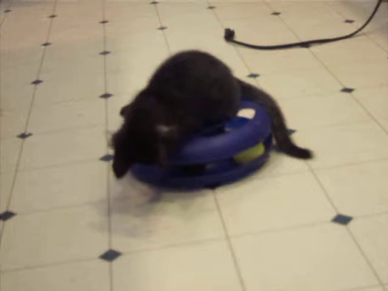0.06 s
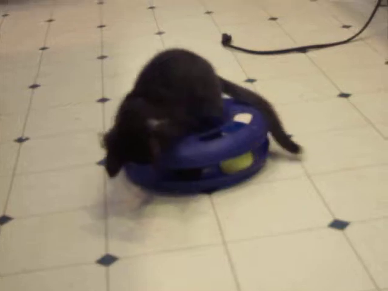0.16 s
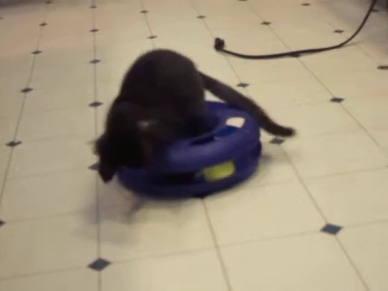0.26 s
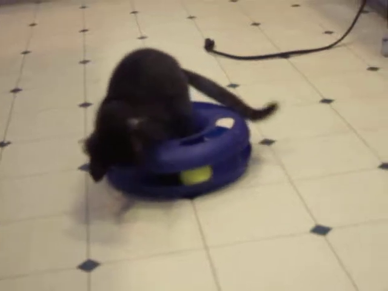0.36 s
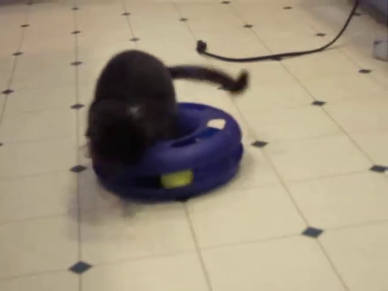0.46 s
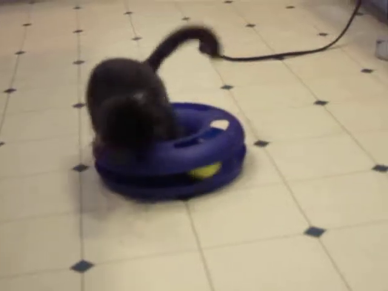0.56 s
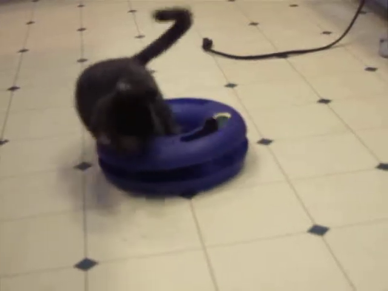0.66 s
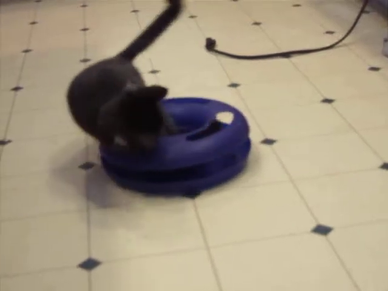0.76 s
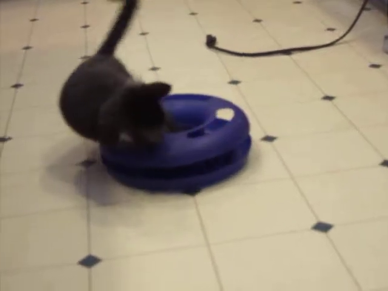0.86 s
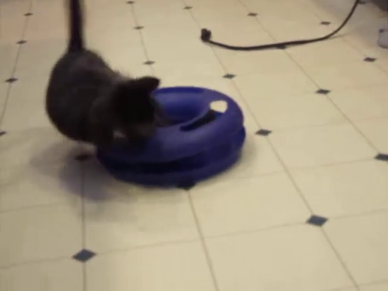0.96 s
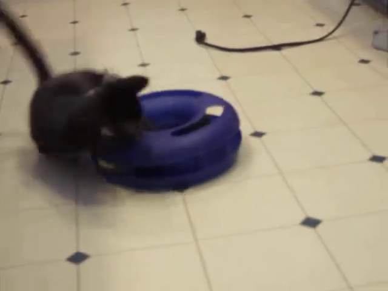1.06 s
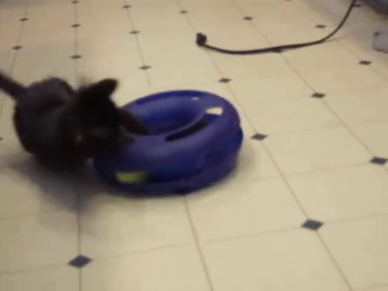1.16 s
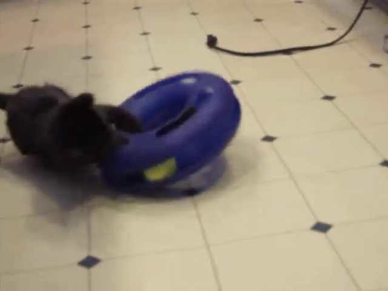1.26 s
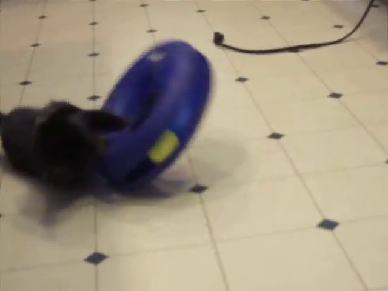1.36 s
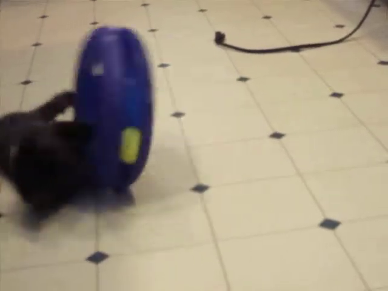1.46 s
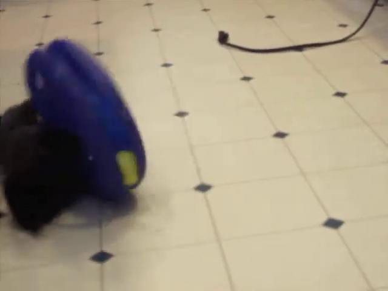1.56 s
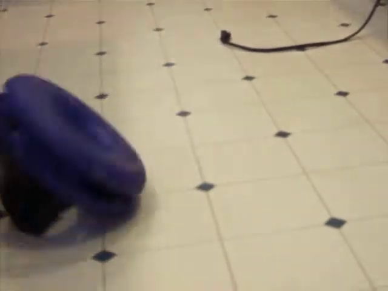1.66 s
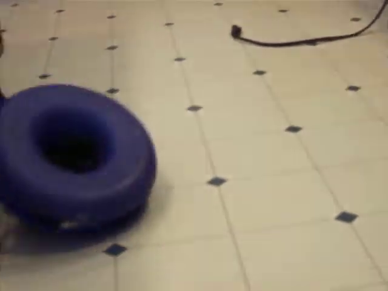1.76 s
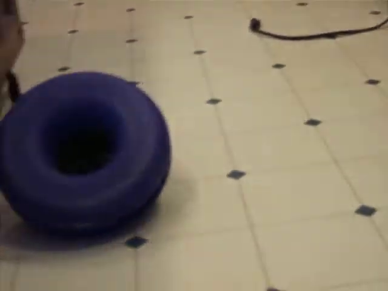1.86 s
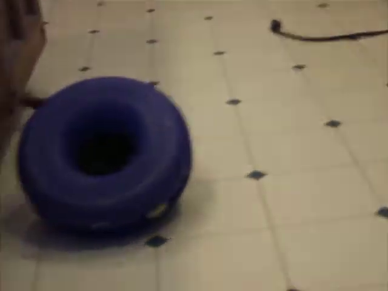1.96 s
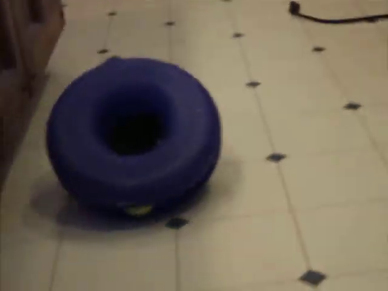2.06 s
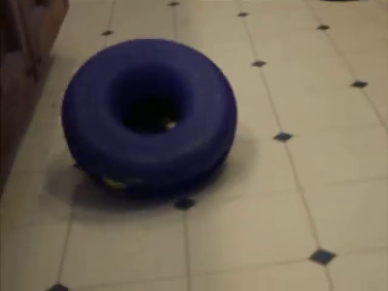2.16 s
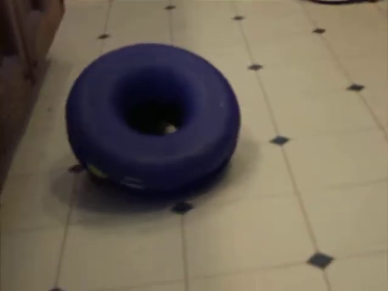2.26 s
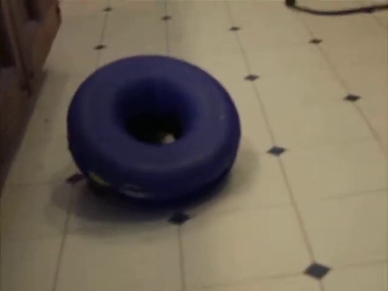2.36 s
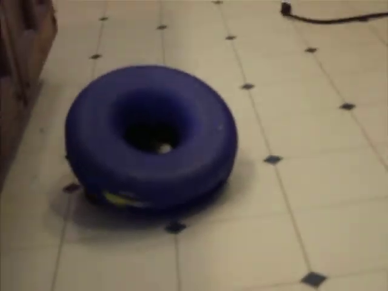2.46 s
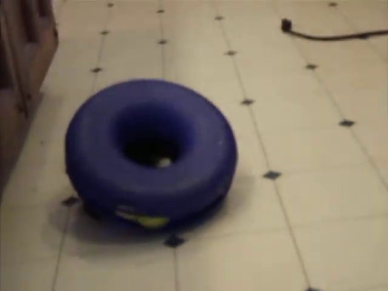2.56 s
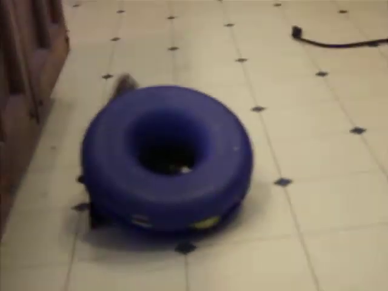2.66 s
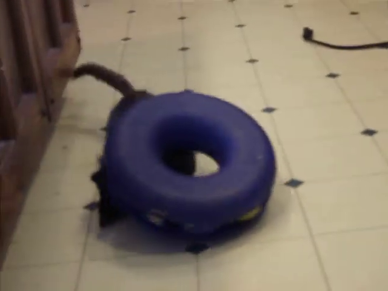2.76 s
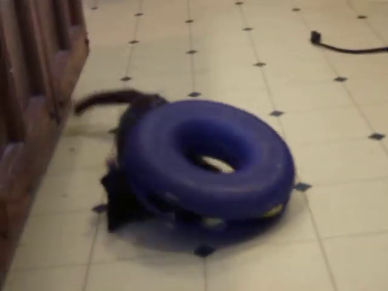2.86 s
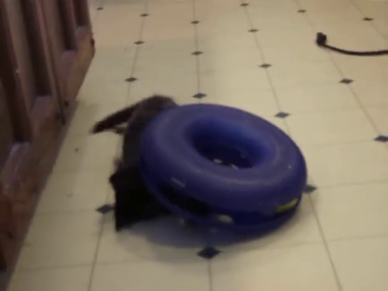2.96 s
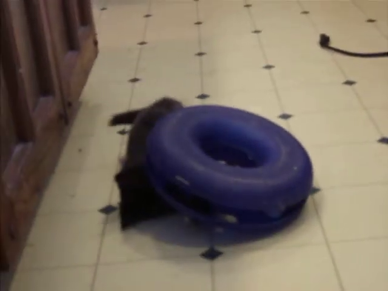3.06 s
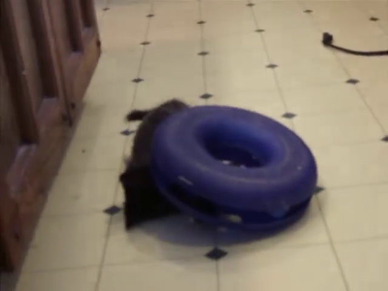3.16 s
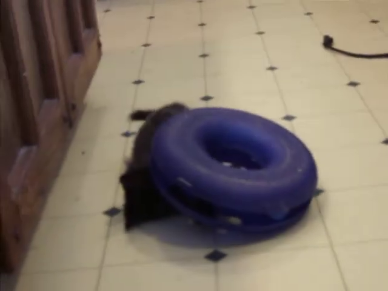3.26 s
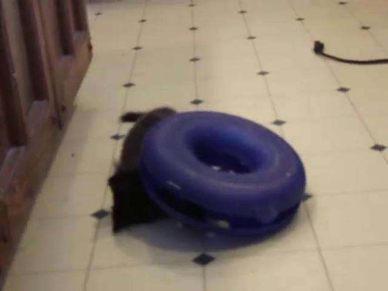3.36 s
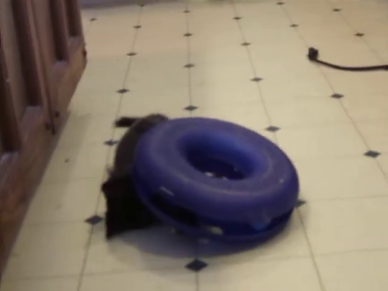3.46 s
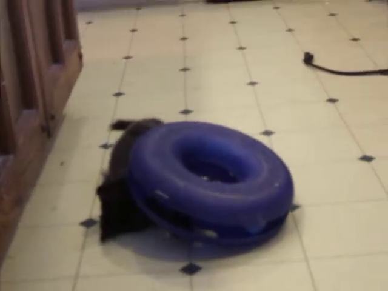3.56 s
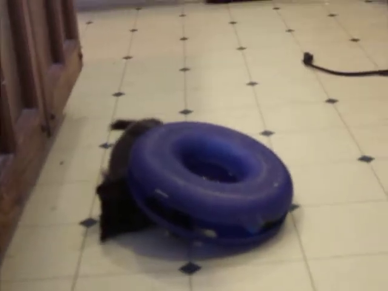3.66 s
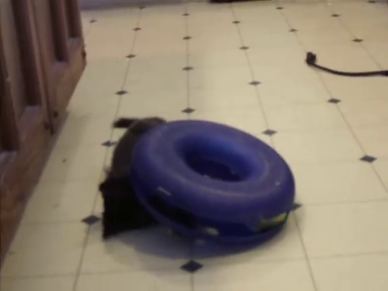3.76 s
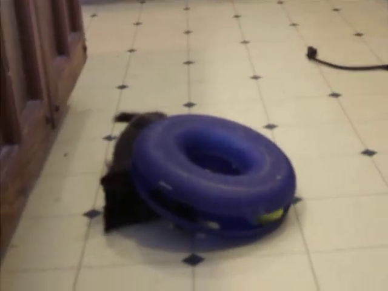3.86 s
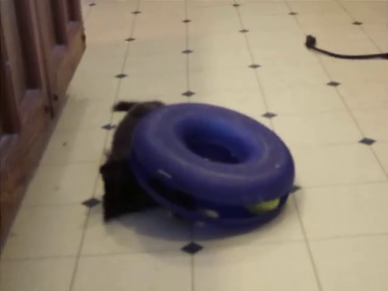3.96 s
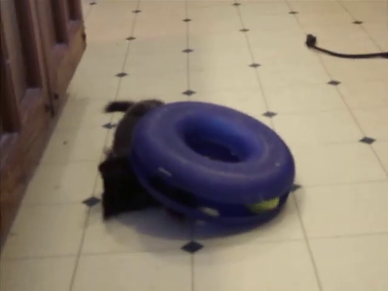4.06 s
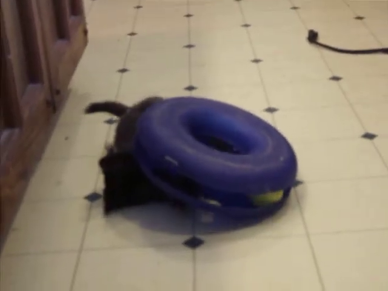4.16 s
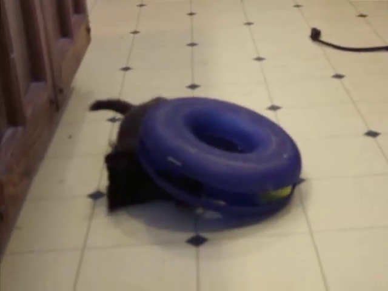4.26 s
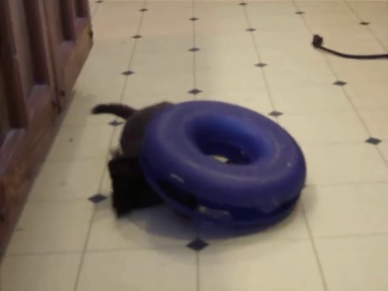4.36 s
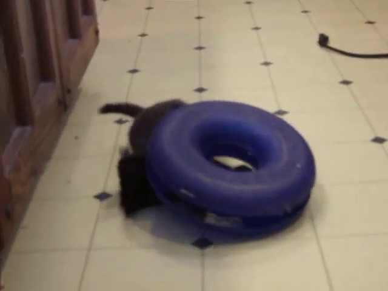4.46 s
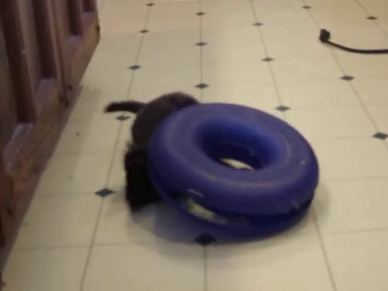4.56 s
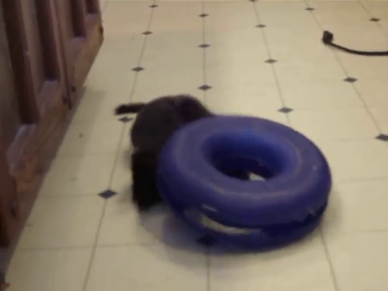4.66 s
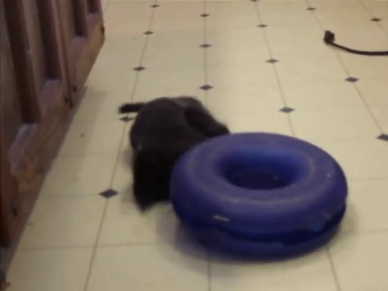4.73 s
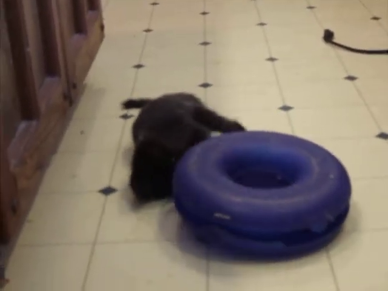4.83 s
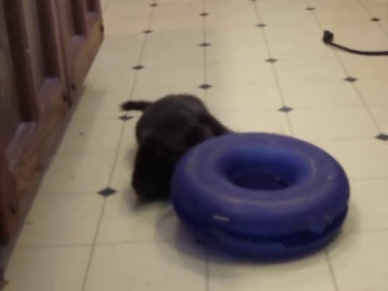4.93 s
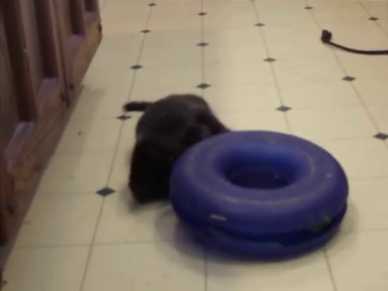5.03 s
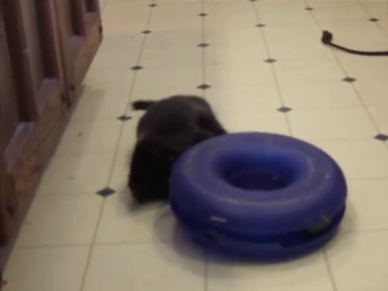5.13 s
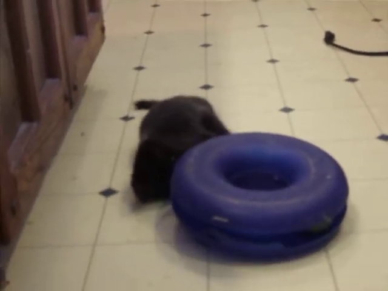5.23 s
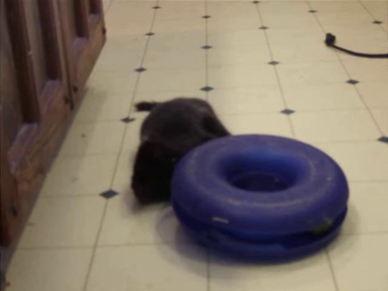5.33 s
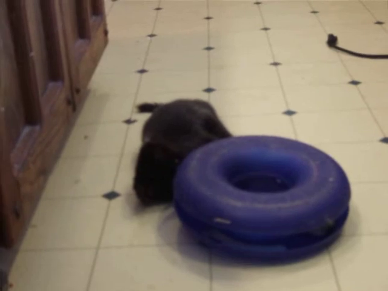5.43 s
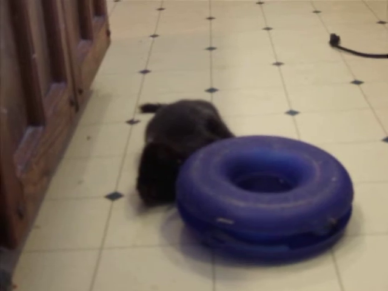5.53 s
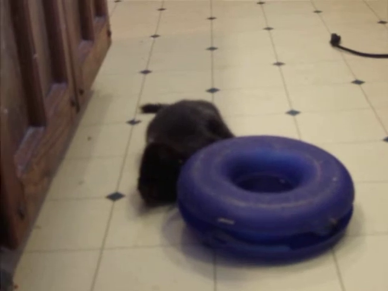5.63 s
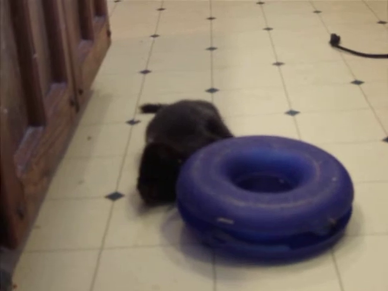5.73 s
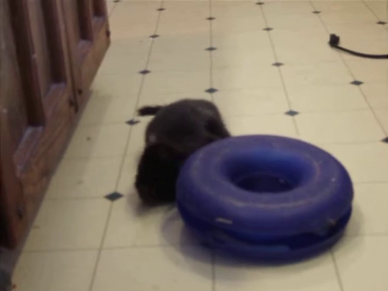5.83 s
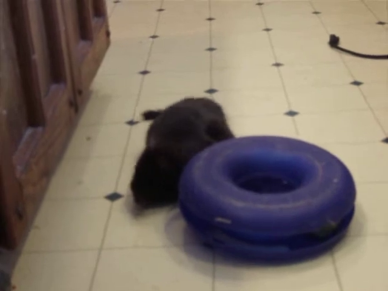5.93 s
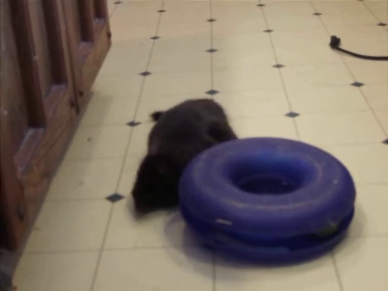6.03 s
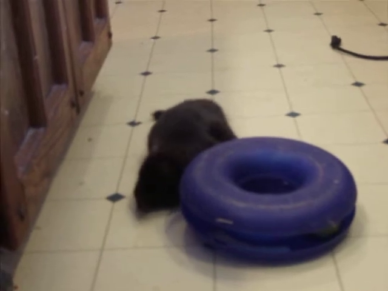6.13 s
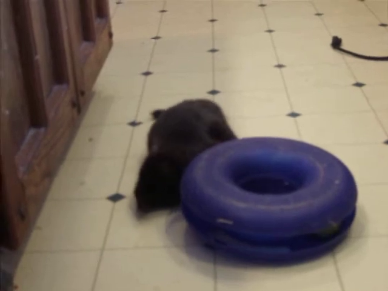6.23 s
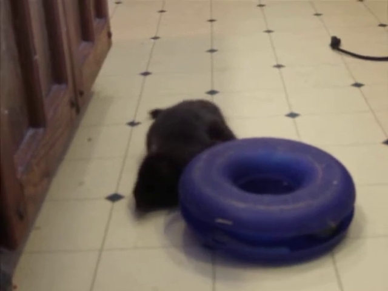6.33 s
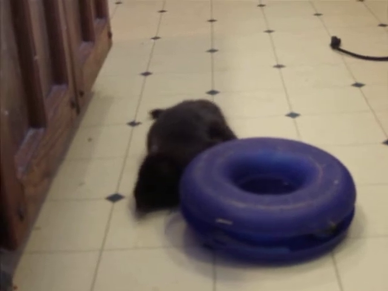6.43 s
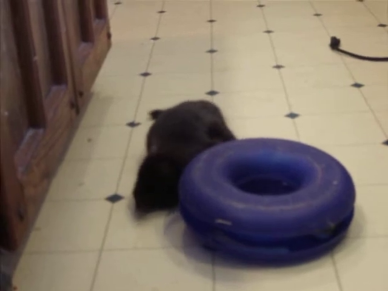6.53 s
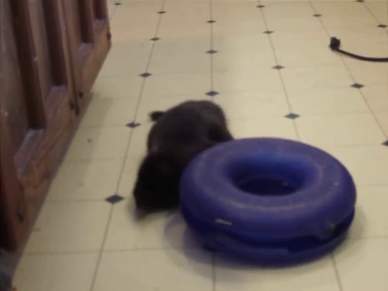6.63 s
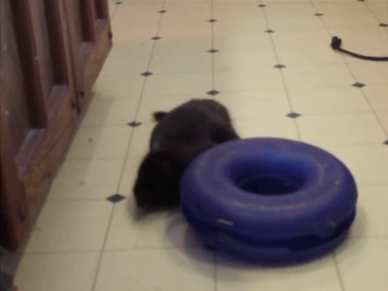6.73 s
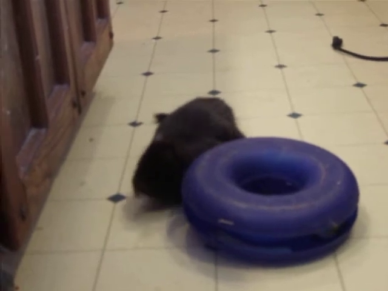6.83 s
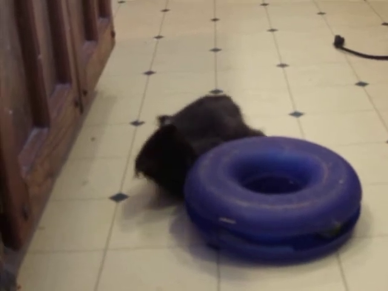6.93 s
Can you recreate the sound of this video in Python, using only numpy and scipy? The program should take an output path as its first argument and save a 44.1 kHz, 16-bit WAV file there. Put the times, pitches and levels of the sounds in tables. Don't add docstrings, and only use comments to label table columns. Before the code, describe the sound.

After a tiny silence, grainy hiss, faint appliance hum and a thin high whine begin. At 0.2 s the ball ticks lightly, and at 0.3 a close padded paw push pops against the hollow ring. From 0.55 to 0.9 claws, ball and rim clatter sharply, loudest near 0.7. Lighter ticks and scraping continue to 1.3, with two low soft bumps near 1.4. A bright crack at 1.5 and a dense hollow rattle around 1.67 lead to ticks at 1.8 and a hard tile landing at 2.02, trailing to 2.2. A softer clatter comes at 2.7-2.85. It is then nearly quiet, with small taps at 3.2, 3.7 and 4.15. Crisp claws at 4.4-4.5 precede a plastic drop at 4.65-4.85. Sparse clicks and short ball rolls follow at 5.0-5.45, weakening through 5.8 and 6.2, with a faint scrape near 6.6. The hard room adds a short wash.

```python
import sys
import numpy as np
from scipy import signal
from scipy.fft import rfft, irfft
from scipy.io import wavfile
from scipy.ndimage import uniform_filter1d

SR = 44100
rng = np.random.default_rng(int(sys.argv[2]) if len(sys.argv) > 2 else 0)


def voltage_ratio(level):
    return 10 ** (np.asarray(level, float) / 20)


def log_audio(samples):
    frames = np.atleast_2d(samples).T
    limited = np.clip(frames, -1, 1)
    pcm = np.round(limited * 32767).astype(np.int16)
    wavfile.write(sys.argv[1], SR, pcm)


N = 308192
T = np.arange(N) / SR


def level(x, db):
    return x * voltage_ratio(db) / np.sqrt(np.mean(x ** 2))


def ring(x, hz, width):
    return signal.lfilter(*signal.iirpeak(hz, hz / width, fs=SR), x)


def walk(rate):
    hold = int(SR / rate)
    steps = np.repeat(rng.standard_normal(N // hold + 1), hold)
    return 0.562 * uniform_filter1d(uniform_filter1d(steps, hold), hold)[:N]


def background():
    # frequency in Hz, density in dB per Hz.
    hiss_curve = [(12, -46), (20, -13), (34, -15), (49, -16), (141, -13.5), (326, -13.5), (389, -13),
                  (2080, -21.5), (6670, -26), (7970, -24.5)]
    # frequency in Hz, wander in Hz, rms level in dB.
    hum_partials = [(333.5, 0.6, -60), (763.6, 2.5, -67), (228.9, 1.4, -69), (190.8, 1.87, -73),
                    (124.7, 1.1, -79)]
    hiss_db, whine_db, whine_hz = -54, -56.5, 7874.02
    frame_hz, frame_start_s = 30, .005

    f = np.fft.rfftfreq(N, 1 / SR)
    curve_hz, curve_db = np.transpose(hiss_curve)
    colour = voltage_ratio(np.interp(np.log(f + 1), np.log(curve_hz), curve_db))
    hiss = irfft(rfft(rng.standard_normal(N)) * colour, N)
    hum = 0
    for hz, wander, db in hum_partials:
        swing = voltage_ratio(db + 1 + 1.1 * walk(3.9))
        hum = hum + swing * np.sin(2 * np.pi * np.cumsum(hz + wander * walk(6)) / SR)
    whine = np.sqrt(2) * voltage_ratio(whine_db) * np.sin(2 * np.pi * whine_hz * T)
    flip = np.sign(np.sin(np.pi * frame_hz * (T - frame_start_s)))
    return level(hiss, hiss_db) + hum + flip * whine


def pings():
    # start in seconds,
    # peak in dB, frequency in Hz, fade in ms.
    shell_pings = [(.2345, -44.5, 900, 1.9), (.552, -30, 875, 0.96), (.692, -38, 994, 4.5),
                   (0.757, -28, 4440, 1.2), (.8545, -34.5, 810, 1.5), (0.887, -27.5, 1060, 1.45),
                   (.907, -41, 2000, 2), (1.013, -39.5, 1870, 1.6), (1.046, -40.5, 1770, 1.5),
                   (1.148, -35.5, 2030, 2.2), (1.295, -41.5, 755, 6.5), (1.307, -37, 780, 3),
                   (1.321, -41.5, 757, 2.7), (1.567, -35.5, 3620, 1.1), (1.585, -31.5, 1760, 0.95),
                   (1.664, -24.5, 1410, 2.4), (1.704, -27.5, 1052, 2.4), (1.713, -24, 871, 3.3),
                   (1.724, -29.5, 1030, 3.4), (1.734, -34.5, 860, 3.3), (1.99, -33, 2270, 3.4),
                   (1.998, -28.5, 1094, 2.6), (2.005, -28, 2510, 2.2), (2.013, -35.5, 1087, 3.4),
                   (2.035, -20.5, 880, 1.7), (2.085, -26.5, 1127, 2.6), (2.743, -34.5, 886, 1.9),
                   (2.768, -26.5, 1040, 3.5), (2.778, -31, 1060, 2.3), (2.802, -33, 993, 3),
                   (2.823, -32, 954, 3), (4.3966, -33, 3270, 1.5), (4.411, -40.5, 3220, 3),
                   (4.494, -43.5, 6940, 4.8), (4.509, -39, 6840, 1.9), (4.494, -45, 990, 10),
                   (4.717, -41.5, 1040, 3), (4.7488, -26, 1003, 2), (4.754, -30, 1070, 1.8),
                   (4.766, -33, 1000, 3.1), (4.787, -25.5, 1006, 2.3), (4.793, -27, 923, 1.5),
                   (4.803, -34, 1008, 3.3), (4.808, -35.5, 996, 3.4), (0.659, -27.5, 4230, 7),
                   (0.67, -31, 4200, 5.5), (.6345, -35, 4850, 2.2), (0.067, -45, 6530, 5),
                   (.651, -24.5, 843, 7.1), (.664, -21, 802, 4.5), (.718, -28, 1926, 2.8),
                 (.727, -28, 361, 14), (0.748, -27, 1460, 3.4), (.772, -31, 2180, 3),
                 (1.2233, -38, 1500, 1.5), (1.292, -41, 1590, 3.3), (1.335, -45, 1464, 5.3),
                 (1.502, -36, 1180, 3.8), (1.512, -38.5, 617, 7.5), (1.665, -26.5, 1520, 7.8),
                 (1.674, -24.5, 1153, 6.1), (1.677, -29.5, 647, 6), (1.695, -33, 1300, 4),
                 (1.957, -40, 1960, 2), (0.3121, -33.5, 1550, 0.8), (2.025, -20.5, 1410, 2.1),
                 (2.074, -30, 3820, 1.7), (2.113, -39, 1150, 2.5), (2.14, -40, 2473, 3.2),
                 (2.051, -35, 986, 3.4), (2.062, -30, 1050, 4), (2.212, -41.5, 2390, 3),
                 (2.224, -45, 2500, 2.1), (2.764, -37, 2940, 3.6), (2.766, -35, 4880, 2.6),
                 (3.242, -45.5, 439, 4.7), (4.748, -34, 2290, 1.8), (4.832, -35.5, 780, 7.8),
                 (4.902, -38, 1043, 4), (4.922, -42, 1096, 3.3), (5.024, -41, 1002, 3.8),
                 (5.368, -43, 710, 2), (5.436, -37, 1102, 3.5), (5.401, -42.5, 6650, 1.8),
                 (5.189, -39, 1100, 3.5), (5.208, -37.5, 1146, 5.7), (5.232, -42, 1096, 4),
                 (5.088, -41.5, 1078, 6), (5.131, -45.5, 1075, 2.7), (4.411, -44, 4720, 4.5),
                   (.3158, -39, 669, 4), (0.7237, -28, 6840, 1.2), (.77, -33, 7000, 2.1),
                   (1.35, -44, 830, 2.3), (1.49, -42.5, 4500, 2.5), (1.499, -22, 4670, 1.3),
                   (1.4992, -27, 6460, 1.5), (1.663, -18, 6660, 0.75), (1.664, -28, 2896, 4),
                   (1.7027, -28, 6170, 1.1), (1.472, -39.5, 6770, 1.8), (1.984, -43, 4940, 4.3),
                   (1.995, -42, 5230, 2.7), (1.685, -29.5, 1420, 3.5), (2.611, -47, 992, 14),
                   (2.697, -43, 990, 6.4), (4.3943, -26, 6800, 0.78), (4.3943, -30, 4600, .8),
                   (4.46, -36.5, 5700, 0.84), (4.709, -33, 7260, 3.4), (4.741, -35, 6500, 2.3),
                   (4.903, -37, 7330, 1.5), (5.098, -47, 1090, 3.4), (5.367, -42, 3330, 2.2),
                   (5.442, -45, 3210, 2.7), (5.62, -49, 1070, 5.5), (5.783, -50, 1063, 8),
                   (6.163, -47, 3350, 2.4), (6.187, -45, 905, 2), (6.194, -48.5, 1048, 6.3)]
    swell_share, split = 0.55, 0.055

    out, t = np.zeros(N), np.arange(SR // 10) / SR
    for s, db, hz, ms in shell_pings:
        fade = max(ms, .5) / 1000
        pair = np.sin(2 * np.pi * hz * t) + .4 * np.sin(2 * np.pi * hz * (1 + split) * t)
        swell = 1 - np.exp(-t / (swell_share * fade))
        out[int(s * SR):][:len(t)] += voltage_ratio(db) * swell * np.exp(-t / fade) * pair * 2
    return out


def rubs():
    rub_starts = [.651, .662, 1.664, 1.831, 3.203, 4.405, 4.41, 2.1, 1.975, .7, 1.55, 1.135, .174, 5.61,
                  5.068, 2.9, .725, 4.77]
    # rms level in dB, frequency in Hz, width in Hz, length in ms, fade in ms.
    rub_tones = [(-35.5, 793, 200, 24, 1.6), (-38.5, 7800, 600, 13, 2.1), (-30.5, 1300, 170, 3.4, 9.4),
                 (-43.5, 2600, 1100, 2.1, 2.2), (-56, 2250, 580, 31, 2.8), (-61, 3100, 520, 40, 9.5),
                 (-49.5, 4800, 800, 26, 4), (-52, 2340, 350, 116, 15), (-47.5, 1900, 670, 88, 9.3),
                 (-50, 100, 53, 38, 33), (-61, 66, 37, 150, 78), (-64, 100, 41, 15, 16),
                 (-49.5, 3000, 410, 2.1, 2.4), (-57.5, 1000, 150, 14, 9.9), (-57, 720, 110, 37, 13),
                 (-65, 146, 36, 270, 26), (-42.5, 290, 21, 32, 22), (-58.5, 120, 55, 32, 27)]
    out = 0
    for s, (db, hz, width, length, fade) in zip(rub_starts, rub_tones):
        ms = 1000 * (T - s)
        press = (ms > 0) * np.exp(-np.maximum(ms - length, 0) / fade)
        gain = voltage_ratio(db) * np.sqrt(SR / width)
        out = out + gain * ring(ring(press * rng.standard_normal(N), hz, width), hz, width)
    return out


def contacts():
    # start in seconds, crack peak in dB,
    # depth in dB of the hollow ring over the crack, chatter in ms.
    claw_hits = [(.5657, -15, -16, 4.7), (.312, -32.5, -23, 1.9), (.7225, -20, -4.5, 3.2),
                 (.6845, -13.5, -17, 4.4), (.821, -24.5, -18, 4.3), (1.068, -36.5, -30, 3.2),
                 (1.101, -32, -5, 3.5), (1.1639, -24.5, -30, 3), (1.274, -28, -15, 5.3),
                 (1.4985, -17, -13, 3.5), (1.6628, -17, -5.5, 3.2), (1.822, -21.5, -41, 1.1),
                 (1.836, -29.5, -31, 1.2), (2.1605, -31.5, -6, 4.6), (2.6854, -41, -35, 3.2),
                 (2.7267, -29.5, -14, 2.8), (2.799, -40, -23, 3.1), (3.707, -32, -8.5, 5),
                 (4.147, -34, -8.5, 4.4), (4.3942, -25, -17, 1.2), (4.4595, -29.5, -34, 2.4),
                 (4.482, -30, -13, 2.3), (4.6658, -24.5, -8, 11), (4.7155, -28, -15, 2.8),
                 (4.708, -37, -34, 4.3), (.5785, -24, -24, 1.6), (.59, -29, -24, 2),
                 (.608, -37.5, -30, 3.1), (.98, -34.5, -20, 2.5), (4.8243, -20.5, -24, 2.6),
                 (4.9896, -29, -25.5, 1.8), (5.366, -28.5, -7, 2.9), (5.4013, -34.5, -25, 3.8)]
    ball_hits = [(.186, -36, -2, 1.95), (0.6503, -21.5, -7.5, 10.5), (0.667, -25, -3, 3.9),
                 (0.7435, -14.5, -4, 3.5), (1.293, -32.5, -4.5, 5.3), (1.7019, -25, -2.5, 2),
                 (1.8054, -33, 2.5, 3.2), (2.8362, -29, -8, 3.3), (3.7866, -37.5, -3.5, 4.5),
                 (4.7403, -30, -15, 3), (5.1308, -43.5, 9, 1.8), (5.219, -42.5, 0.5, 2.8),
                 (5.4333, -28.5, -5.5, 2.8), (5.7657, -32.5, -6, 1.7), (5.9684, -42.5, -3.5, 6.7),
                 (6.1623, -34.5, -4.5, 1.8)]
    rim_hits = [(0.2124, -40, -12, 1.9), (.793, -32, -4, 2.6), (0.5188, -39, -3, 11),
                (0.716, -9.5, -11, 1.56), (0.768, -20, -14.5, 3.3), (0.8872, -32.5, 2.5, 2.2),
                (.9634, -31.5, -8, 5.4), (1.0238, -35, -4.5, 4.1), (1.1475, -36, -7, 4.2),
                (1.471, -39.5, -9, 3), (1.5664, -35, -4.5, 1.9), (1.584, -36, 1, 5),
                (1.9567, -38, 7.5, 1.1), (2.0233, -12.5, -2, 2.8), (2.0724, -25, 2.5, 3.1),
                (2.0866, -33.5, 5.5, 2.6), (2.483, -41, -3.5, 4.2), (2.7376, -29, 3, 4.8),
                (2.7641, -25.5, 1, 5.1), (3.204, -44.5, 5.5, 2.9), (4.7481, -30, 1.5, 2.1),
                (4.785, -21.5, -6.5, 2.4), (4.9025, -34, -3.5, 3), (5.0228, -32.5, -6, 4),
                (5.188, -42, 5, 3)]
    # snap in dB, wall in dB, both over the crack.
    knock_colour = [
        (-12, -16),
        (-5.5, -11),
        (-5.5, -3.5),
    ]
    # start in seconds, peak in dB, chatter in ms.
    weight_hits = [(0.534, -32, 11), (0.719, -28, 1.8), (1.002, -34, 9.5), (1.096, -33, 4.8),
                   (1.146, -33.5, 2.3), (1.273, -47, 2.1), (1.497, -41, 4.3), (1.566, -42, 3.1),
                   (1.663, -25.5, 6.6), (1.95, -40, 2.5), (2.021, -38.5, 5.6), (2.797, -36, 4),
                   (2.899, -51.5, 4.2), (3.042, -49, 6.1), (3.239, -44.5, 2.6), (4.499, -46, 6.4),
                   (4.662, -40.5, 3), (5.36, -44, 5.8), (6.157, -48, 3.3)]
    snap_per_depth, wall_per_depth = 0.14, 0.14

    knocks = np.concatenate([claw_hits, ball_hits, rim_hits])
    counts = [len(claw_hits), len(ball_hits), len(rim_hits)]
    snap, wall = np.repeat(knock_colour, counts, axis=0).T
    _, crack, depth, _ = knocks.T
    return [(knocks, crack),
            (knocks, crack + snap + snap_per_depth * depth),
            (knocks, crack + depth),
            (knocks, crack + wall + wall_per_depth * depth),
            (weight_hits, np.array(weight_hits)[:, 1])]


def effort(moves, extra_db=0):
    total = voltage_ratio(-72.5)
    coarse = T[::32]
    for (s, db, swell, fade, *_), more in zip(moves, np.broadcast_to(extra_db, len(moves))):
        ms = 1000 * (coarse - s)
        distance = np.where(ms < 0, -ms / max(swell, 1), ms / max(fade, 1))
        total = total + voltage_ratio(db + more) * np.exp(-distance)
    return np.interp(T, coarse, 20 * np.log10(total))


def drags():
    # peak time in seconds, level in dB, swell in ms, fade in ms.
    scrape_moves = [(.2, -55, 240, 140), (.568, -30, 21, 50), (.664, -26, 3.5, 23), (.72, -32, 3.9, 105),
                    (.9, -48.5, 80, 520), (1.35, -50, 110, 170), (1.502, -31, 0.9, 13),
                    (1.64, -46.5, 57, 33), (1.666, -26.5, 2.1, 9.3), (1.92, -46.5, 160, 15),
                    (2.0, -42, 12, 14), (2.026, -27, 4.2, 23), (2.18, -47, 75, 65), (2.7, -44.5, 83, 95),
                    (2.766, -38, 6, 57), (3.1, -52.5, 110, 35), (4.35, -56, 170, 30),
                    (4.396, -46.5, 3.4, 80), (4.49, -47, 71, 84), (4.667, -45, 23, 130),
                    (4.757, -36.5, 32, 30), (4.786, -38, 4, 65), (5.02, -60, 40, 23), (5.185, -51, 71, 45),
                    (5.367, -49.5, 4.3, 18), (5.433, -57, 14, 45), (6.59, -53.5, 11, 180)]
    # peak time in seconds, level in dB, swell in ms, fade in ms.
    roll_moves = [(.2, -59.5, 13, 120), (5.47, -46.5, 24, 49), (.566, -37.5, 26, 47), (.655, -29, 3, 26),
                  (.727, -29, 13, 47), (.95, -41, 57, 125), (1.33, -47.5, 71, 82), (1.51, -36, 10, 43),
                  (1.666, -26.5, 1, 17), (1.69, -37.5, 6.1, 73), (1.85, -49, 70, 72), (2.015, -34, 26, 12),
                  (2.027, -23.5, 2.1, 9.1), (2.14, -41, 22, 60), (2.61, -47, 44, 230), (2.79, -35, 15, 52),
                  (3.22, -59.5, 96, 23), (3.714, -60.5, 13, 13), (4.35, -58, 240, 55),
                  (4.49, -48.5, 80, 54), (4.72, -43.5, 42, 37), (4.8, -35.5, 46, 46), (5.03, -56.5, 3, 12),
                  (5.11, -55, 69, 65), (5.21, -38.5, 17, 26), (5.369, -51, 2.4, 33), (5.77, -47.5, 3.2, 25),
                  (5.975, -50, 8, 26), (6.17, -53.5, 8, 42), (6.59, -57.5, 20, 240)]
    # peak time in seconds, level in dB, swell in ms, fade in ms,
    # weight on the floor in dB.
    rock_moves = [(.19, -58, 7.8, 68, 6.5), (.4, -65, 88, 38, 12.5), (.566, -35.5, 18, 37, -3),
                  (.652, -33.5, 5, 28, 0.5), (.722, -27, 6.4, 64, -9), (1.0, -51.5, 100, 200, -2.5),
                  (1.187, -54, 100, 160, 3.5), (1.39, -54.5, 11, 110, 10.5), (1.502, -32, 1.2, 9.7, -7),
                  (1.668, -36, 1.2, 19, -12.5), (1.958, -46, 1.2, 15, 4.5), (2.017, -29.5, 24, 19, -26),
                  (2.04, -30, 14, 62, -14), (2.179, -54, 40, 32, 4.5), (2.677, -59, 78, 79, 10),
                  (2.767, -38, 7.1, 38, -17), (3.05, -75.5, 63, 110, 7), (3.226, -58.5, 68, 15, 2),
                  (3.75, -64, 130, 83, 11.5), (4.49, -55.5, 95, 44, 3), (4.7, -55, 33, 95, 7),
                  (4.786, -48.5, 8.1, 63, -2.5), (5.19, -42.5, 3, 32, -10.5), (5.4, -59.5, 24, 61, 1.5)]
    scrape = effort(scrape_moves)
    weight = effort(rock_moves, np.array(rock_moves)[:, -1])
    return scrape, scrape, effort(roll_moves), effort(rock_moves), weight


def chatter(events, db, share):
    lag_s, blow_share = .0005, 1.6
    blows, rattle, t = np.zeros(N), np.zeros(N + SR), np.arange(SR // 8) / SR
    for (s, *_, ms), peak in zip(events, voltage_ratio(db)):
        s = s + lag_s
        fade = max(ms * share, .3) / 1000
        bite = 1 - np.exp(-t / (0.23 * fade))
        decay = np.exp(-t / fade) + 0.1 * np.exp(-t / (6.2 * fade))
        rattle[int(s * SR):][:len(t)] += peak * bite * decay
        blows[int(s * SR)] = blow_share * peak * np.sqrt(fade * SR / 2) * min(2.34 / ms, 1)
    return blows, rattle[:N]


def scratch(db, grit_db=4.0, lump_db=1.0):
    size = np.minimum(rng.exponential(1, N // 20 + 1), 3.5)
    grains = np.repeat(size, 20)[:N]
    return level(voltage_ratio(grit_db * grains + lump_db * walk(40)), 0) * voltage_ratio(db)


def family(force, modes, broad_db, hz, width):
    def shape(x):
        rattle = ring(ring(x, hz, width), hz, width)
        sharp = sum((-1) ** k * voltage_ratio(db) * ring(x=rattle, hz=f, width=w) for k, (f, w, db) in enumerate(modes))
        return sharp + voltage_ratio(broad_db - 9.0) * rattle
    impulse = np.eye(1, SR)[0]
    return shape(force) / np.sqrt(np.sum(shape(impulse) ** 2))


def toy():
    # frequency in Hz, width in Hz, level in dB.
    crack_modes = [(5150, 160, 0), (5950, 220, 11.5), (6480, 870, 2), (6860, 280, 13.5), (7410, 400, 5)]
    snap_modes = [(2840, 250, -16), (3342, 44, 7), (4250, 110, -2.5), (4744, 270, 4.5)]
    hollow_modes = [(780, 87, -3), (926.5, 36, 0), (1033, 165, -5.5), (1193, 37, 1.5), (1300, 28, -14.5)]
    wall_modes = [(1420, 42, -25), (1770, 60, 8.5), (2130, 180, -19), (2240, 30, -19.5), (2790, 110, -15.5)]
    thud_modes = [(176.4, 14, -3.5), (227.2, 4.2, 2), (366.2, 16, 2), (111.4, 30, -2.5)]
    # knock offset in dB, drag offset in dB, broad rattle in dB,
    # rattle centre in Hz, rattle width in Hz.
    family_mix = [
        (-6, -4.5, 13, 6850, 6600),
        (-4, -11.5, 8.5, 3700, 4100),
        (-10, -7, -5, 1002, 610),
        (-5.5, -5.5, 10, 1630, 2800),
        (-6, -4.5, 1.5, 220, 293),
    ]
    chatter_share = [.45, .55, 1.3, .8, 2.5]

    all_modes = (crack_modes, snap_modes, hollow_modes, wall_modes, thud_modes)
    out = 0
    for (events, peak_db), drag, modes, share, (hit_db, drag_db, *broad) in zip(
            contacts(), drags(), all_modes, chatter_share, family_mix):
        blows, rattle = chatter(events, peak_db + hit_db, share)
        rough = rattle + scratch(drag + drag_db)
        out = out + family(blows + rough * rng.standard_normal(N), modes, *broad)
    return out


def bumps():
    bump_starts = [.3112, .3116, 1.38525, 1.3913, 1.2215]
    bump_squash = [0, 0, .3, .4, 0]
    # peak in dB, frequency in Hz, swell in ms, hold in ms, fade in ms.
    bump_tones = [
        (-13.5, 790, 1.42, 2.06, 1.1),
        (-17.5, 1300, 0.74, 0.51, 1.1),
        (-31, 333, 1.3, 6, .5),
        (-30.5, 187, .6, 11.8, .6),
        (-32.5, 840, 0.99, 1.5, 1.8),
    ]
    out = 0
    for s, squash, (db, hz, swell, hold, fade) in zip(bump_starts, bump_squash, bump_tones):
        ms = 1000 * np.maximum(T - s, 0)
        push = (1 - np.exp(-(ms / swell) ** 2)) * np.exp(-np.maximum(ms - hold, 0) / fade)
        turn = 2 * np.pi * hz * ms / 1000
        out = out + voltage_ratio(db) * push * (np.sin(turn) + squash * np.cos(2 * turn))
    return out


def kitchen(x):
    t60_s, wash_db, top_hz = 0.49, -13.5, 5300
    t = np.arange(SR // 2) / SR
    wash = rng.standard_normal(len(t)) * voltage_ratio(-60 * t / t60_s) * (t > .004)
    wash = signal.lfilter(*signal.butter(1, top_hz, fs=SR), wash)
    wash = wash / np.sqrt(np.sum(wash ** 2))
    return x + voltage_ratio(wash_db) * signal.fftconvolve(x, wash)[:N]


def scene():
    room = kitchen(toy() + rubs() + pings())
    dulled = signal.lfilter(*signal.butter(4, 7500, fs=SR), room)
    return (dulled + bumps() + background())[None]


def roll_off(x):
    return signal.sosfilt(signal.butter(12, 9270, fs=SR, output="sos"), x)


def record(dry):
    up, down = 441, 160
    step, offset = 2 ** -7.5, .00035
    smooth_hz, smooth_beta, start_s = 8031, 8.2, 0.064

    pad = np.pad(dry[0], (0, up - N % up))
    size = len(pad) // up * down
    slow = irfft(rfft(pad)[:size // 2 + 1], size) * down / up
    steps = step * np.floor((slow + offset) / step)
    taps = signal.firwin(numtaps=32 * up + 1, cutoff=smooth_hz, window=("kaiser", smooth_beta), fs=SR * down)
    smooth = signal.resample_poly(steps, up, down, window=taps)[None, :N]
    return roll_off(smooth * (T > start_s))


dry = scene()
out = record(dry)
log_audio(out)
```